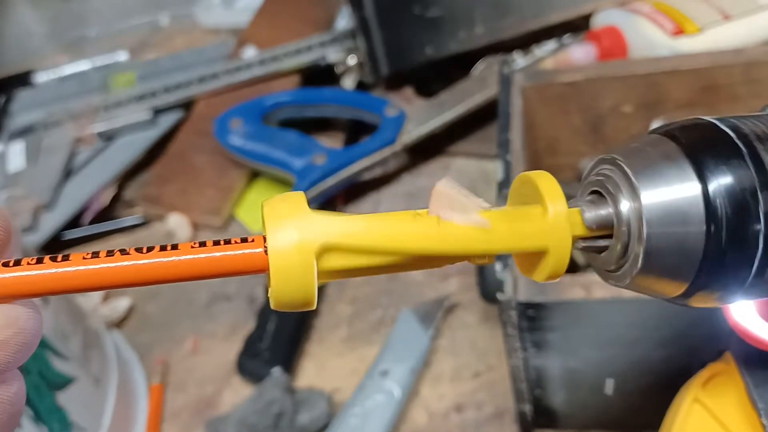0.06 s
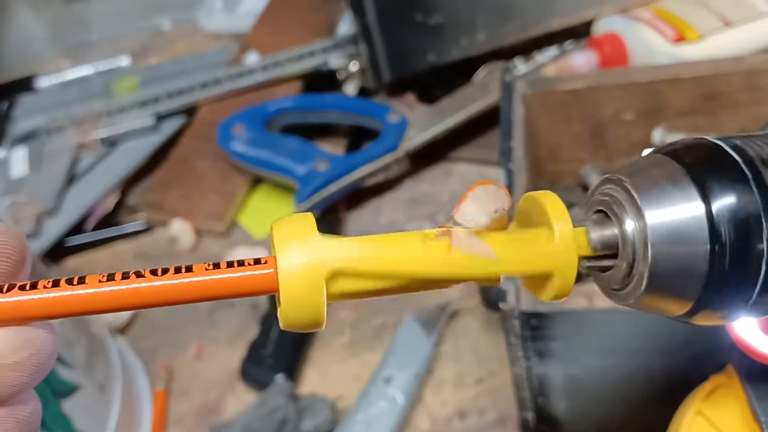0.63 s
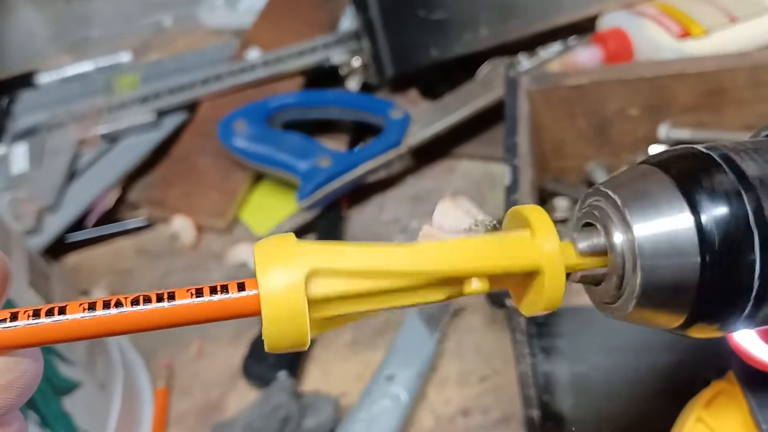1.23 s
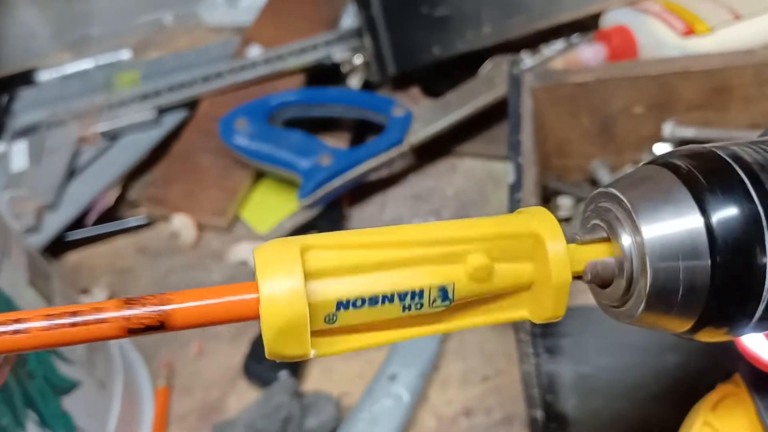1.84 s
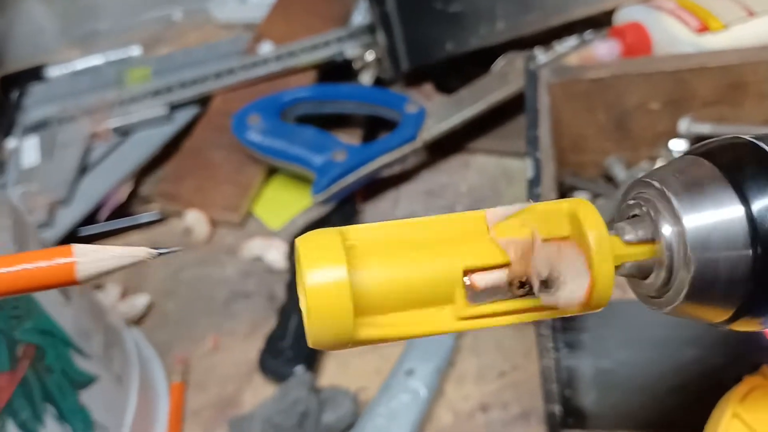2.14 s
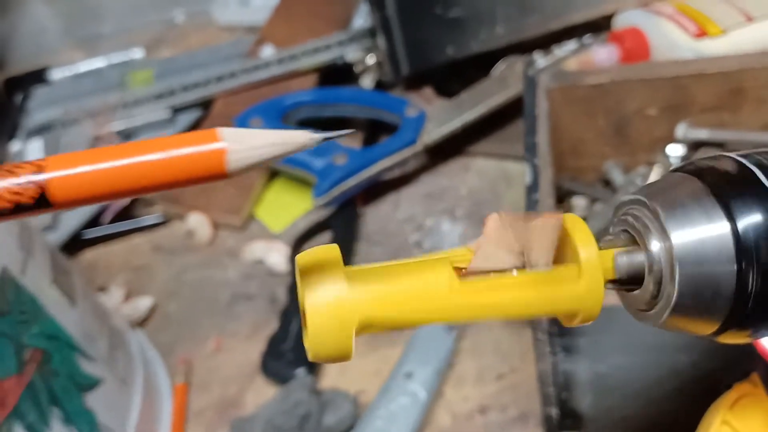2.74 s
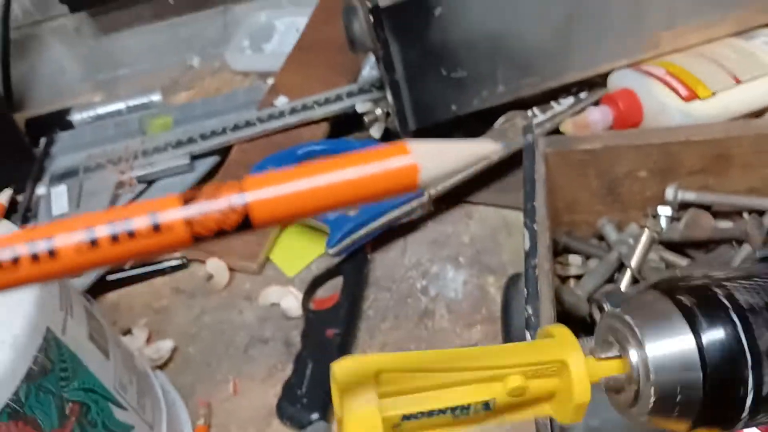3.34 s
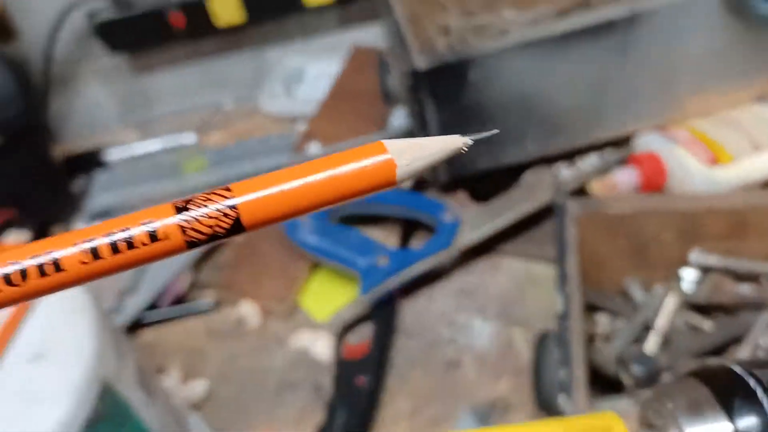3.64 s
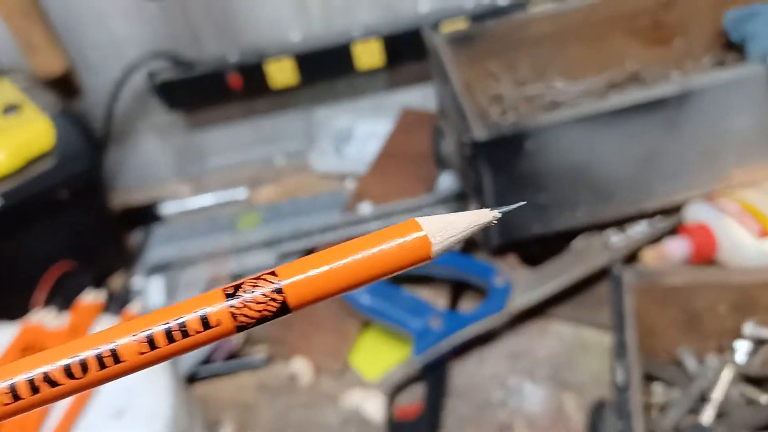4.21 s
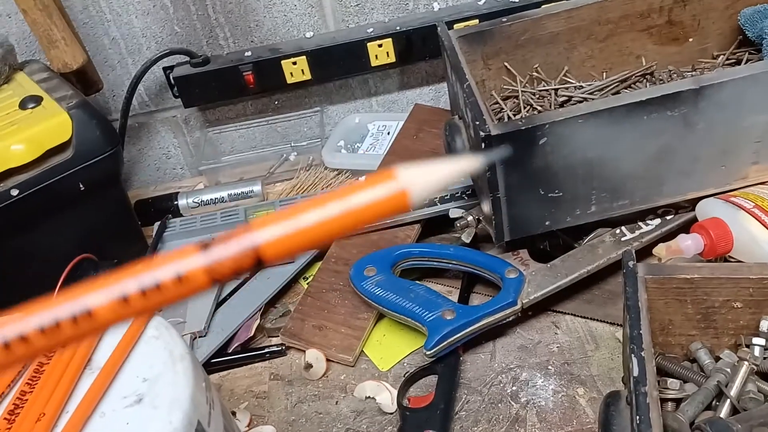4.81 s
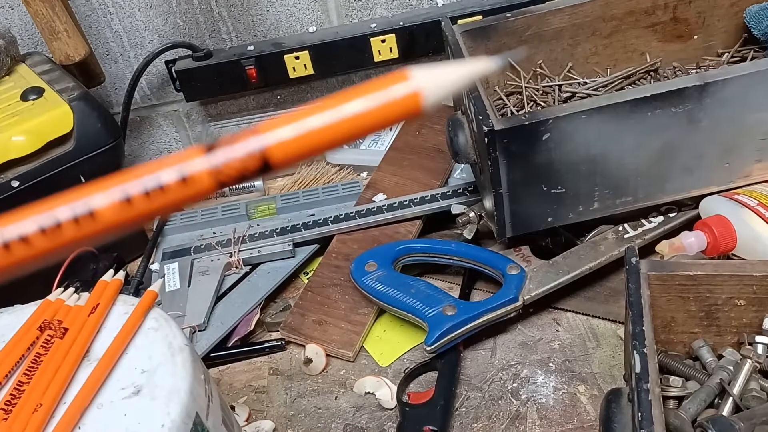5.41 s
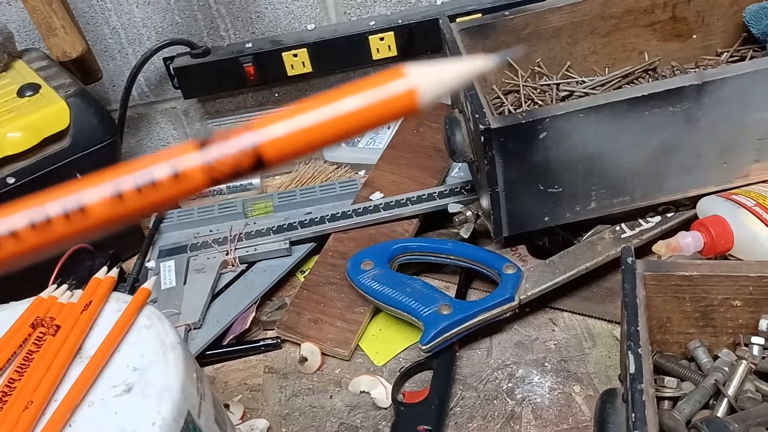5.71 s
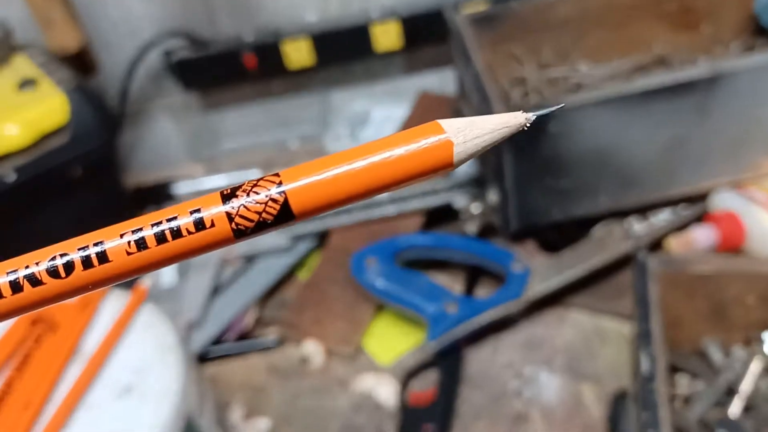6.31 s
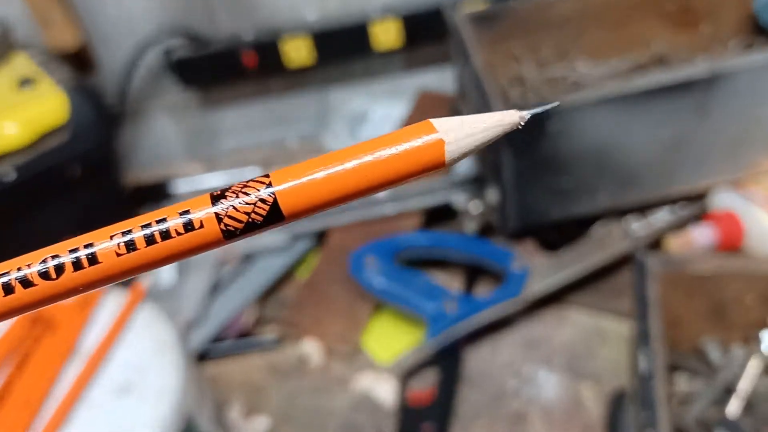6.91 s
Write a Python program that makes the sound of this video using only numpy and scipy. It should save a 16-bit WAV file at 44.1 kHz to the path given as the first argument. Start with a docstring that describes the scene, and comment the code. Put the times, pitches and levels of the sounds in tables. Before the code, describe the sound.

Close on the right, a cordless drill whirs under load, turning a sharpener against a pencil at a workbench. Soft scraping and a few sharp, bright cracks of wood sit over the humming gears, airy hiss and very high whistle. The scraping fades as the motor speeds up a little and settles at a steady pitch. Turned away from the microphone, it keeps running, slightly duller, with a few soft handling thumps.

```python
"""A workshop, close up: a cordless drill spins a pencil sharpener just to the right of the microphone.
The blade shaves and snaps the wood and holds the motor back; as the pencil is pulled out, the drill
speeds up, runs free and is turned away. Shaft and gears hum and whirr, the speed controller whistles
near 10 kHz, the fan hisses, and the hand knocks softly on the grip."""
import sys
import numpy as np
from scipy import signal
from scipy.fft import rfft, irfft
from scipy.io import wavfile
from scipy.ndimage import uniform_filter1d

SR = 44100
rng = np.random.default_rng(int(sys.argv[2]) if len(sys.argv) > 2 else 0)


def dump_mix(stems):
    """Bounce the given channels to the path in sys.argv[1] as a 16-bit WAV at rate SR."""
    frames = np.atleast_2d(stems).T  # one column per channel
    limited = np.clip(frames, -1, 1)  # hard clip at full scale
    pcm = np.round(limited * 32767).astype(np.int16)
    wavfile.write(sys.argv[1], SR, pcm)


N = 306495
T = np.arange(N) / SR
BINS = np.fft.rfftfreq(N, 1 / SR)


# Shaft hum, faltering as the pencil is drawn out. Each row: time in seconds, level in dB.
SHAFT_HUM = [(0, -38), (.39, -34.5), (.46, -41), (.56, -36.5), (1, -36), (1.3, -39.5), (1.5, -46),
             (1.65, -45.5), (1.73, -38.5), (1.82, -39), (1.9, -44.5), (2.15, -39), (2.6, -37), (3.1, -36),
             (4.3, -38), (5.3, -35.5), (6.95, -35.5)]
# The housing's answer to the fan's whine. Each row: whine pitch in Hz, level in dB outside the beam.
FAN_RESPONSE = [(3470, -27.5), (3555, -48), (3605, -43), (3650, -30), (3720, -28), (3850, -32),
                (3970, -35.5), (4015, -32)]
# Motor and gear tones, close on the right. Each row: multiple of the shaft rate, relative level in dB
# cutting, the same running free, change in dB when turned away, left port against right in dB.
GEAR_TONES = [(.25, -74, -52, -1, -5), (.773, -61, -56, 0, -2), (1.613, -46, -46, -5, -7),
              (1.75, -53, -58, 0, -5), (2, -51, -53, -1.5, -5), (2.08, -49.5, -66, 0, -3),
              (2.547, -50, -58, -4, 0), (3, -40, -42, -2, -1), (3.25, -70, -54, 0, 0),
              (3.32, -70, -58, 5, -9), (4, -51, -38.5, -3, -11), (4.03, -43, -58, 0, -11),
              (5, -62, -45, 7.5, -17), (5.5, -48, -44, -1, -12), (6, -44, -41, -4, -18),
              (6.12, -60, -46, 0, -18), (6.5, -50, -42, -2, -24), (8.19, -41, -60, 0, -12)]

def motor(turns, speed, load, turned, fan_blades=7, resonance_hz=4280, width_hz=326):
    """Shaft, fan and gears sound at multiples of the shaft rate; the cut makes the hum stagger."""
    hum_db = curve(SHAFT_HUM) + 2 * np.sqrt(load) * wander(13)
    # the hum fills both ports in the cut and leans right when the drill runs free
    hum = tone(turns, hum_db, -5 + 4 * load, .05 + .1 * load, flutter_hz=35, lag=.8 - .6 * load)
    fan_db = np.interp(fan_blades * speed, *np.transpose(FAN_RESPONSE)) + 4 * facing(turned)
    whine = tone(fan_blades * turns, fan_db, left_db=-21, flutter=.1, flutter_hz=25)
    # the eighth shaft tone sweeps through a housing resonance as the cut lets go
    in_tune = np.exp(-((8 * speed - resonance_hz) / width_hz) ** 2)
    singing = tone(8 * turns + .25, -46.5 + 14.5 * in_tune, left_db=-11, flutter=.2, flutter_hz=25)
    lag = .36 + .58 * load ** 2  # radians per shaft multiple; the drill is angled differently in the cut
    gears = sum(partial(k * turns, blend_db(cut, free, load) + away * turned, left, 22, lag * k)
                for k, cut, free, away, left in GEAR_TONES)
    return hum + whine + singing + amp(-.7) * gears


# The switching whistle and its two neighbours, each beaming its own way. Each row: offset in shaft rates,
# level in dB cutting, the same running free, turn at which it faces the microphone, dB lost per unit
# of turn from there, left port against right in dB.
WHISTLES = [(-1, -30.5, -29.5, 0, 7, -32), (0, -30.5, -31, 0.35, 8, -13.5),
            (1, -33.5, -29.5, 0.54, 11.5, -20)]
# Weaker tones around them. Each row: offset in shaft rates, level in dB cutting, the same running free,
# change in dB when turned away, left port against right in dB.
SIDE_TONES = [(-5, -62, -52, 0, -17), (-4, -49, -51, 4, -18), (-2, -50, -47.5, 3, -16),
              (0.5, -54, -53, 3, -20), (2, -41, -41.5, -4.5, -21), (3, -43.5, -46.5, -5, -18),
              (5, -35, -35, -17, -20), (6, -55, -53, 2, -20), (7, -47, -45, -15, -22),
              (8, -45, -38.5, -15, -17), (10, -48, -44, -30, -29)]

def controller(turns, load, turned, switch_hz=9823):
    """Chopped current sings in the windings; the turning rotor splits it into side tones."""
    switching = np.cumsum(switch_hz + 2 * wander(1.2) + 2.5 * wander(25)) / SR
    trio = np.zeros((2, N))
    for k, cut, free, aim, loss_db, left in WHISTLES:
        level_db = blend_db(cut, free - loss_db * abs(turned - aim), load)
        # the centre is out of step with its neighbours, so the trio warbles more than it pulses
        trio += tone(switching + k * turns + .17 * (k == 0), level_db, left, flutter=.075, flutter_hz=30)
    sides = sum(partial(switching + k * turns, blend_db(cut, free, load) + away * turned, left, 15)
                for k, cut, free, away, left in SIDE_TONES)
    return trio + sides


# Gear cycles that make the rattle throb. Each row: multiple of the shaft rate, RMS depth.
THROBS = [(.2267, .1), (.5, .075), (.7733, .085), (1, .075), (1.2267, .05), (1.7733, .04)]
# The housing's ring, then the low churn of the gears, running free and pressed together by the cut.
# Each row: frequency in Hz, relative noise density in dB.
HOUSING_RING = [(1500, -102.5), (2400, -73), (3150, -63.5), (3450, -58), (4050, -54.5), (4300, -55.5),
                (4600, -60), (5500, -68.5), (6700, -71.5), (7500, -72.5), (8300, -68.5), (9000, -72.5),
                (16000, -93)]
CHURN_FREE = [(20, -105), (50, -91), (90, -76), (130, -78), (180, -83), (228, -74), (300, -83), (640, -75),
              (830, -67), (1000, -75.5), (1320, -70), (1700, -75.5), (2100, -70), (3500, -89)]
CHURN_CUTTING = [(20, -106), (60, -90), (130, -82), (180, -85), (215, -76.5), (280, -89), (400, -80),
                 (640, -76.5), (830, -67), (1000, -81), (1320, -63.5), (1650, -78), (2000, -67),
                 (2400, -102), (3500, -82)]

def gearbox(turns, load, turned):
    """Tooth impacts blur into a rattle that throbs with the planet gears, over a low churn."""
    throb = 1 + sum(np.sqrt(2) * depth * np.cos(2 * np.pi * (k * turns + rng.random()))
                    for k, depth in THROBS)
    swell_db = 1.43 * facing(turned)  # as the fan's beam sweeps past
    rattle_db = -1.35 + 1.5 * load - 2 * turned + swell_db + .76 * wander(39)
    rattle = noise(HOUSING_RING) * throb * amp(rattle_db)
    free = noise(CHURN_FREE) * np.sqrt(1 - load) * amp(2 - 3 * turned)
    cutting = noise(CHURN_CUTTING) * np.sqrt(load)
    return rattle + (free + cutting) * amp(1.32 * wander(17))


# Air from the vents, heard up close and then from the side.
# Each row: frequency in Hz, relative noise density in dB.
AIR_RUSH = [(500, -101), (1200, -89), (3000, -68), (6000, -74.5), (8000, -77), (9500, -69), (12500, -67.8),
            (15000, -69.5), (16000, -73)]
SIDE_HISS = [(5600, -93), (6700, -65), (7500, -88), (8300, -79), (9000, -102)]

def vents(load, turned):
    """The fan blows a hiss out of the housing; turned away, it fades and a duller hiss comes round."""
    rush_db = 1.5 + 1.6 * load - 9.5 * turned
    return noise(AIR_RUSH) * amp(rush_db) + noise(SIDE_HISS) * turned


# Blade on wood, equally loud at both ports. Each row: frequency in Hz, relative noise density in dB.
SHAVING = [(100, -113), (215, -74.5), (280, -80), (400, -80.5), (520, -62), (700, -90), (1400, -87),
           (3500, -81.5), (6000, -98), (10000, -100), (12500, -116), (15500, -91)]

def blade(load):
    """The shaving tears off unevenly while the blade is loaded."""
    return noise(SHAVING, shadowed=False) * load * amp(2 * wander(4.4) + 2 * wander(160) - 1)


# Wood and graphite snapping close to the microphone. Each row: start in seconds, peak in dB at the
# right port ahead of the limiter, share of duller crack from 0 to 1.
SNAPS = [(.4463, -24, .1), (.4543, -8, .05), (.4550, -5.5, .65), (.4615, -12, 1), (1.131, -25, .3),
         (1.159, -24, .4), (1.467, -13, .15), (1.4795, -12, .1)]

def snaps(bright_hz=13800, blade_hz=5350):
    """Brittle cracks, very bright, with a duller ring of the blade and a scatter off the bench."""
    out, t = np.zeros((2, N)), np.arange(2048) / SR
    bright_band = signal.butter(2, [bright_hz * .85, 15800], "band", fs=SR, output="sos")
    blade_band = signal.butter(1, [blade_hz * .93, blade_hz * 1.07], "band", fs=SR, output="sos")
    envelope = np.exp(-t / .0005) + amp(-23) * np.exp(-t / .006)
    for start, db, share in SNAPS:
        burst = rng.standard_normal((2, len(t))) * envelope
        bright = (1 - share) * signal.sosfilt(bright_band, burst)
        dull = 2 * share * signal.sosfilt(blade_band, burst)
        crack = bright + dull + .08 * burst
        crack /= abs(crack).max(axis=1, keepdims=True)
        add(out, start, amp([[db - 14 * share], [db]]) * crack)
    return out


# The hand on the drill, faint under the motor. Each row: start in seconds, peak in dB at the right port.
KNOCKS = [(3.235, -35), (3.514, -36), (3.568, -33.5), (3.931, -35), (4.305, -39), (5.64, -35), (5.959, -33),
          (6.477, -28)]
# Modes of the plastic grip. Each row: frequency in Hz, relative level in dB.
GRIP_MODES = [(110, -7), (220, 0), (300, -5.5)]

def knocks(decay_s=.0086, rise_s=.0026):
    """Dull thumps of the hand: three quickly damped modes of the grip, mostly on the right."""
    out, t = np.zeros((2, N)), np.arange(6000) / SR
    for start, db in KNOCKS:
        ring = sum(amp(level) * np.sin(2 * np.pi * (hz * t + rng.random())) for hz, level in GRIP_MODES)
        thump = ring * np.exp(-t / decay_s) * (1 - np.exp(-t / rise_s))
        add(out, start, amp([[db - 18], [db]]) * thump / abs(thump).max())
    return out


# The body that carries the microphone shadows its left port.
# Each row: frequency in Hz, left against right in dB.
LEFT_SHADOW = [(60, -2), (230, -5.5), (400, 0), (800, -6), (1300, -5), (1700, -11.5), (2400, -6),
               (3200, -14), (4100, -19.5), (5500, -10.5), (7000, -11), (9300, -12), (11000, -17.5),
               (15000, -16.5)]
# How alike the two ports sound. Each row: frequency in Hz, likeness from 0 to 1.
PORT_LIKENESS = [(50, 0.6), (250, 0.54), (800, 0.18), (2000, 0.79), (4000, 0.17), (15000, 0.1)]

def noise(spectrum, shadowed=True, delay_s=.00026):
    """Coloured noise, partly alike at the two ports; if shadowed, weaker and later on the left."""
    right, other = rfft(rng.standard_normal((2, N))) * np.sqrt(SR / 2) * amp(across(spectrum))
    alike = np.clip(across(PORT_LIKENESS), 0, 1)
    left = alike * right + np.sqrt(1 - alike ** 2) * other
    if shadowed:
        left = left * amp(across(LEFT_SHADOW)) * np.exp(-2j * np.pi * BINS * delay_s)
    return irfft(np.array([left, right]), N)


def tone(turns, level_db, left_db, flutter, flutter_hz, lag=1.0):
    """A sine that flutters in level and phase; the left port trails by lag radians."""
    knots = np.arange(0, T[-1] + 1, 1 / flutter_hz / 2)
    swell, jitter = (flutter * np.interp(T, knots, v) for v in rng.standard_normal((2, len(knots))))
    size = np.sqrt(2) * amp(level_db) * (1 + swell)
    angle = 2 * np.pi * (turns % 1) + jitter
    return size * np.array([amp(left_db) * np.cos(angle - lag), np.cos(angle)])


def partial(turns, level_db, left_db, flutter_hz, lag=1):
    """A fluttering tone with a phase of its own."""
    return tone(turns + rng.random(), level_db, left_db, .22, flutter_hz, lag)


def blend_db(cut_db, free_db, load):
    """A tone's level between free and loaded; even a light cut steadies the gears."""
    bite = load ** .7
    return 20 * np.log10(bite * amp(cut_db) + (1 - bite) * amp(free_db))


def facing(turned, aim=.61, half_width=.62):
    """How squarely the fan's beam of sound points at the microphone, from 0 to 1."""
    return np.maximum(1 - abs(turned - aim) / half_width, 0)


def amp(db):
    """Decibels to gain."""
    return 10 ** (np.asarray(db) / 20)


def curve(rows):
    """A time table at every sample."""
    return np.interp(T, *np.transpose(rows))


def across(points):
    """A spectrum at every frequency bin, joined on a log axis."""
    hz, value = np.transpose(points)
    return np.interp(np.log(BINS + 1), np.log(hz), value)


def wander(rate_hz):
    """Smooth random drift of unit size, moving up to about the given rate."""
    drift = irfft(rfft(rng.standard_normal(N)) / (1 + (BINS / rate_hz) ** 4), N)
    return drift / drift.std()


def add(mix, start, sound):
    """Lays a two-channel sound into the mix at a start in seconds."""
    part = mix[:, round(start * SR):][:, :sound.shape[1]]
    part += sound[:, :part.shape[1]]


# The shaft, held back until the pencil is drawn out. Each row: time in seconds, turns per second.
SHAFT_SPEED = [(0, 496), (.25, 496.6), (.57, 516), (.92, 507.5), (1.17, 508.7), (1.35, 526.3), (1.6, 543),
               (2, 562.7), (2.45, 571.2), (3, 573.6), (5.2, 573.6), (5.7, 574.4), (6.95, 574.2)]
# The drill's turn from the microphone.
# Each row: time in seconds, turn from 0 (held up close) to 1 (lowered away).
TURNED_AWAY = [(0, 0), (2.85, 0.11), (3.35, 0.55), (3.9, 0.96), (4.5, 1), (5.1, 0.84), (5.7, 0.64),
               (6.95, 0.68)]

def scene(free_hz=574.4, cutting_hz=505):
    """The shaft speed sets the pitches and its sag tells the load; turning away shifts the balance."""
    speed, turned = curve(SHAFT_SPEED), curve(TURNED_AWAY)
    load = np.clip((free_hz - speed) / (free_hz - cutting_hz), 0, 1)
    wobble_hz = (.478 + 1.268 * load) * wander(13.92)
    turns = np.cumsum(speed + wobble_hz) / SR
    tones = motor(turns, speed, load, turned) + controller(turns, load, turned)
    return tones + gearbox(turns, load, turned) + vents(load, turned) + blade(load) + snaps() + knocks()


def record(dry, limit_db=-6, recovery_db_per_s=16, edge_hz=15800):
    """A limiter ducks at once under the loudest snap and recovers slowly; a low-pass trims the top."""
    peak_db = 20 * np.log10(abs(dry).max(axis=0) + 1e-9)
    fall_db = T * recovery_db_per_s
    held_db = np.maximum.accumulate(peak_db + fall_db) - fall_db
    over_db = np.maximum(held_db - limit_db, 0)
    ducked = dry / amp(uniform_filter1d(over_db, size=40))
    lowpass = signal.firwin(511, edge_hz, window=("kaiser", 9), fs=SR)
    return signal.oaconvolve(ducked, lowpass[None], "same", axes=1)


dry = scene()
out = record(dry)
dump_mix(out)
```